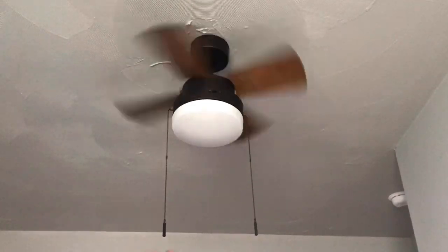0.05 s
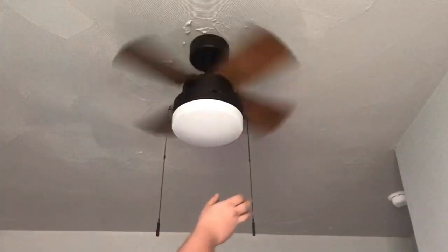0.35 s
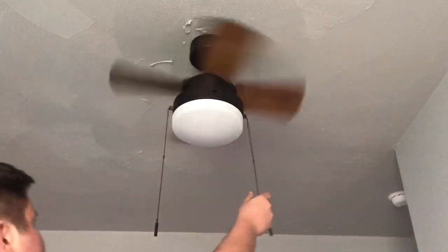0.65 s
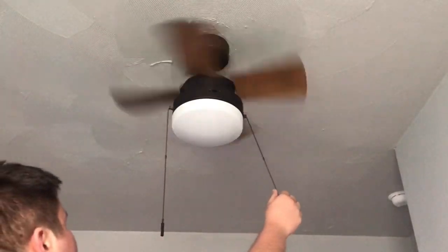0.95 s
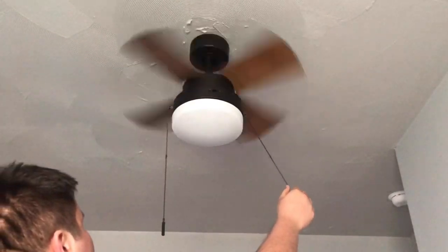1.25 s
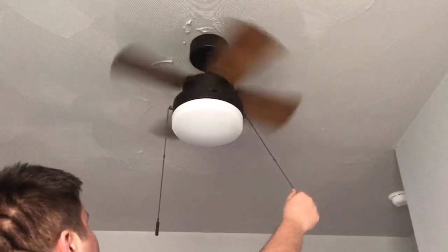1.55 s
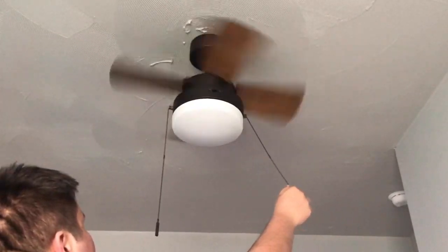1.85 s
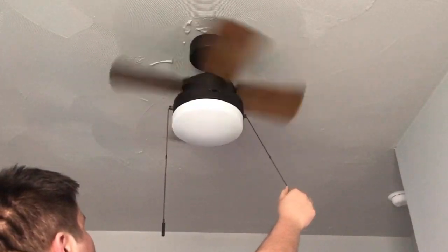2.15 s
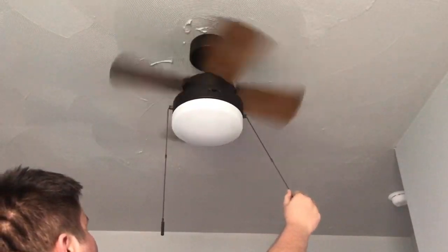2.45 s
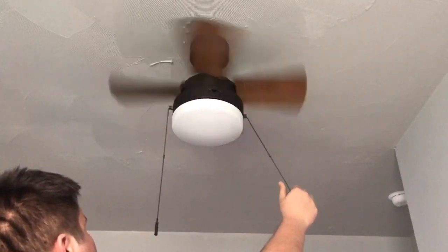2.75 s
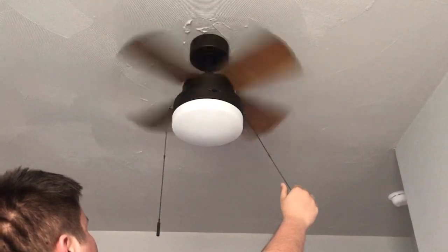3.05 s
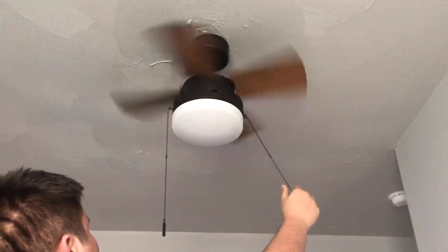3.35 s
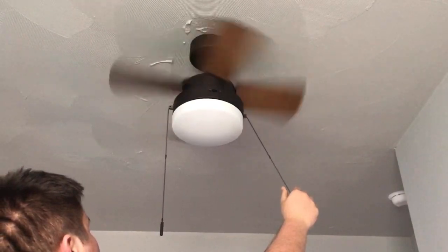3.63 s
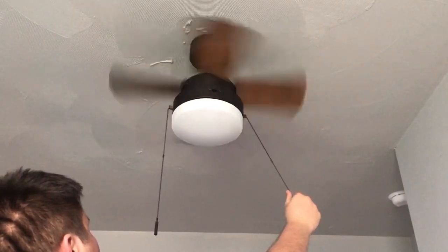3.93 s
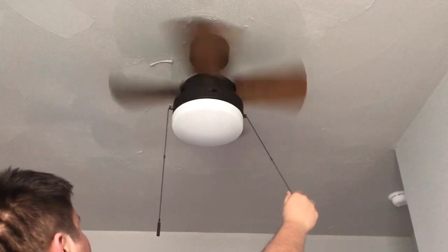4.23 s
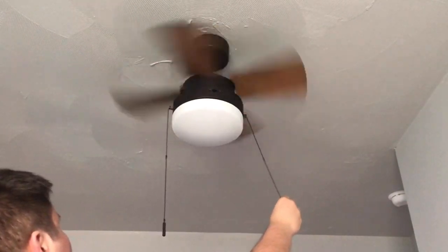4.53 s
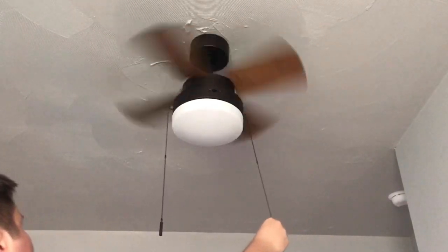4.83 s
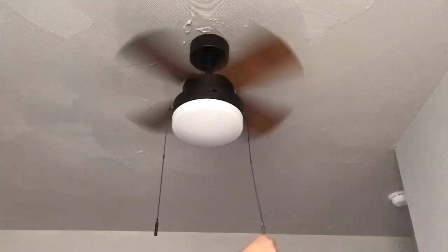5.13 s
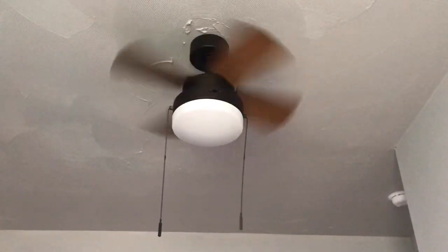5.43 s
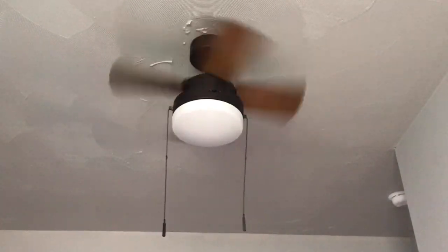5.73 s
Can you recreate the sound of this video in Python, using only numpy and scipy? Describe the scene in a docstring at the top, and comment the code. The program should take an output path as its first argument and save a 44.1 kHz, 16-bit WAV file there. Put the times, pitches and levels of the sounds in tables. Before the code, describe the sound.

Three pulls on a ceiling fan's chain click and snap back over a soft motor drone that changes level in a quiet room.

```python
"""A soft motor drone is heard first: a ceiling fan in a bare bedroom, with a rustle and a soft knock.
The rotor excites the casing's resonances and the coils hum. Someone pulls the chain switch three times,
and each pull changes the motor's level. A pull is three quick clicks, the last jolting the housing;
on release the ratchet ticks and snaps back. Each impact rings the modes of pawl, cover and motor body
and reverberates in the room. Faint knocks and the friction of a sleeve close the scene."""
import sys
import numpy as np
from scipy import signal
from scipy.fft import irfft
from scipy.io import wavfile

SR = 44100
rng = np.random.default_rng(int(sys.argv[2]) if len(sys.argv) > 2 else 0)


def persist_wave(psi):
    """Save psi, clipped to +-1, as 16-bit WAV."""
    counts = np.round(np.clip(psi, -1, 1) * 32767).astype(np.int16)
    wavfile.write(sys.argv[1], SR, np.atleast_2d(counts).T)


N = 254898

# casing resonances driven by the rotor: (frequency [Hz], width [Hz], relative level [dB])
CASING_RESONANCES = [(145, 34, -5), (171, 16, -4.5), (263, 31, -1.5), (293, 12, -3), (352.4, 21, -0.5),
                     (427, 42, -3), (600, 190, -6), (1040, 100, -5)]
# harmonics of the coils' hum: (frequency [Hz], relative level [dB])
MAINS_HARMONICS = [(60, -4), (120, 1), (240, -1.5), (360, -14)]
# the motor at first and after each pull: (drone level [dB], hum level [dB])
MOTOR_SETTINGS = [(-66.5, -75), (-76, -76), (-62, -68.5), (-60.5, -74.5)]
# spectra of room air, cloth, knocks and clicks: (frequency [Hz], relative level [dB])
AIR_SPECTRUM = [(15, -32), (25, -9), (42, 1.5), (60, 3.5), (80, -2.5), (130, -0.5), (400, -6), (800, -14.5),
                (1200, -13.5), (1800, -26), (9000, -26), (14800, -33), (16000, -34)]
CLOTH_SPECTRUM = [(100, -28), (600, -1.5), (1500, -4), (3000, -7.5), (7000, -11), (11000, -17),
                  (16000, -36)]
KNOCK_SPECTRUM = [(15, -18), (45, -10), (90, -7.5), (170, 3), (400, -3), (800, 4), (1400, 0.5),
                  (2400, -9.5), (3600, -13.5), (5000, -23), (10000, -36), (16000, -61)]
CLICK_SPECTRUM = [(60, -16.5), (150, -9), (350, -6.5), (470, -8), (600, 2), (820, -3), (1200, 1),
                  (1600, -1), (2250, -0.5), (3200, -5.5), (4800, -10), (9500, -9), (12500, -19.5),
                  (16000, -26)]
# arm movements that rustle the sleeve: (peak time [s], level [dB], rise [s], fall [s])
ARM_MOVEMENTS = [(.28, -62, 0.21, .36), (4.75, -68.5, 0.39, .9), (5.72, -61, 0.094, 0.045)]
# the room's reverberation time: (frequency [Hz], T60 [s])
REVERBERATION = [(100, 0.61), (600, 0.63), (2000, 0.56), (5000, 0.59), (9000, 0.35), (14000, 0.28)]
# soft knocks and brushes: (time [s], level [dB], contact time [s], tilt [dB/octave])
BUMPS = [(0.113, -62, 0.056, -18), (0.17, -50, 0.012, -9), (0.1944, -38.5, 0.0047, -0.9),
         (0.21, -47, 0.0095, 2.5), (0.401, -61, 0.02, 0), (3.471, -65, 0.0075, 9.5),
         (4.844, -63.5, 0.015, 5.5), (4.999, -59.5, 0.028, 1.5), (5.403, -52.5, 0.022, 3),
         (5.647, -51.5, 0.0078, 3)]
# modes of steel pawl, switch cover, and motor body with blades: (frequency [Hz], level [dB], T60 [s])
PAWL_MODES = [(2240, -12, .4), (2800, -15, .4), (3220, -2.5, 0.29), (4160, -4.5, 0.26), (4860, -5.5, 0.4),
              (5930, -6, 0.31), (6800, -12, 0.28), (8230, -4, 0.23), (8300, -14, 0.24)]
COVER_MODES = [(368.7, -7, 0.92), (411, -8.5, 0.59), (525, -5, 0.51), (572, -3, 0.53), (609.6, 0.5, 0.61),
               (649, -4.5, 0.3), (991, -9, 0.72), (1230, -29, 0.25), (1684, -5.5, 0.49), (1960, -33, 0.49),
               (2235, -10, 0.72), (2720, -17.5, 0.88)]
BODY_MODES = [(145.5, 0.5, 0.85), (169.6, -0.5, 0.32), (207.5, -9.5, 0.61), (226.3, -3, 0.41),
              (255, 3.5, 0.52), (296.4, 2, 0.43), (310.4, 0.5, 0.39), (352, -1, 0.47), (363.7, -0.5, 0.45),
              (423.3, 3, 0.37), (742, -6, 0.33), (890, -9, 0.4), (933, -20, 0.34), (1088, -17, 0.97),
              (1157, -9.5, 0.68), (1180, -39, 0.53), (1594, -11.5, 0.68)]
# ticks as the chain is taken up or runs back: (time [s], level [dB], pawl gain [dB])
RATCHET_TICKS = [(0.7795, -59, -22), (.835, -51.5, -34), (1.335, -42.5, -24), (1.726, -49.5, -15),
                 (1.763, -43.5, -19.5), (2.177, -54.5, -22), (2.5762, -52, -14.5), (2.652, -47, -19),
                 (4.169, -52.5, -14), (4.273, -48, -18), (4.557, -54.5, -20)]
# what a tick excites: (room gain [dB], cover gain [dB], body gain [dB])
TICK_TIMBRE = (-7.5, -14.5, -15.5)
# the spring's return: (time [s], level [dB], ping [Hz], ping gain [dB], cover gain [dB], body gain [dB])
SPRING_SNAPS = [(1.8007, -26, 7800, 6.5, -22, -30), (2.7304, -29, 2200, -16, -14.5, -50),
                (4.3450, -28, 615, -5, -14.5, -30)]
# pulls of the chain: (catch time [s], catch level [dB], contact level [dB], stop level [dB],
# catch to contact [s], catch to stop [s])
CHAIN_PULLS = [(1.3149, -39, -33.5, -32, .0507, 0.073), (2.2405, -36, -33.5, -33, 0.037, .0520),
               (3.7755, -36.5, -35, -30.5, .0348, .0560)]
# what each impact of a pull excites:
# (room gain [dB], cover gain [dB], body gain [dB], pawl gain [dB], ping [Hz], ping gain [dB])
CATCH_TIMBRE = (-7.5, -13, -13.5, -25.5, 9500, 7)
CONTACT_TIMBRE = (-9.5, -23.5, -16, -27, 11500, 8.5)
STOP_TIMBRE = (-8.5, -15.5, -8.5, -31, 6002, -12.5)
REBOUND_TIMBRE = (-10.5, -20, -11, -42, 280, 26)


def amp(db):
    return 10 ** (np.asarray(db) / 20)


def unit_rms(x):
    return x / np.sqrt(np.mean(x ** 2) + 1e-20)


def curve_at(points, hz):
    """Interpolation along a logarithmic frequency axis."""
    f, value = np.transpose(points)
    return np.interp(np.log(hz + 1), np.log(f + 1), value)


def add(mix, start_s, sound):
    """Superposition: a sound sums into the mix from its onset."""
    part = mix[max(round(start_s * SR), 0):][:len(sound)]
    part += sound[:len(part)]


def noise(gain, size):
    """Fourier synthesis: random phases turn a magnitude spectrum into noise of rms 1."""
    return unit_rms(irfft(gain * np.exp(2j * np.pi * rng.random(len(gain))), size))


def waver(hz):
    """Low-pass noise: a random fluctuation of rms 1, up to about hz."""
    return noise(np.exp(-(np.fft.rfftfreq(N, 1 / SR) / hz) ** 2), N)


def motor_levels(settle_s=0.091):
    """Exponential relaxation: each flip of the contacts eases drone and hum [dB] to the next setting."""
    t = np.arange(N) / SR
    levels = np.array(MOTOR_SETTINGS[0])[:, None]
    for (s, *_, to_contact, _), step in zip(CHAIN_PULLS, np.diff(MOTOR_SETTINGS, axis=0)):
        since_flip = np.maximum(t - s - to_contact, 0)
        levels = levels + step[:, None] * (1 - np.exp(-since_flip / settle_s))
    return levels


def motor(waver_db=2.5):
    """Forced vibration: the rotor drives the casing's resonances; the coils hum at mains harmonics."""
    hz, t = np.fft.rfftfreq(N, 1 / SR), np.arange(N) / SR
    drone_db, hum_db = motor_levels()
    power = sum(amp(db) ** 2 / width / (1 + ((hz - f) / width) ** 2) ** 2
                for f, width, db in CASING_RESONANCES)
    drone = noise(np.sqrt(power), N)
    hum = unit_rms(sum(amp(db) * np.sin(2 * np.pi * (f * t + rng.random())) for f, db in MAINS_HARMONICS))
    return drone * amp(drone_db) + hum * amp(hum_db + waver_db * waver(hz=14))


def whine(centre_hz=1410, width_hz=57, level_db=-72, flutter_db=3.0):
    """Narrow-band noise is heard as a fuzzy pitch; amplitude modulation makes it flutter."""
    hz = np.fft.rfftfreq(N, 1 / SR)
    tone = noise(1 / (1 + ((hz - centre_hz) / width_hz) ** 2), N)
    return tone * amp(level_db + flutter_db * waver(hz=35))


def air(level_db=-67.5):
    """Stationary broadband noise: the even hush of air in the room."""
    return amp(level_db) * noise(amp(curve_at(AIR_SPECTRUM, np.fft.rfftfreq(N, 1 / SR))), N)


def rustle(rest_db=-72, grain_db=0.26):
    """Friction noise: cloth slides in small uneven slips, and the powers of the arm's movements add."""
    hz, t = np.fft.rfftfreq(N, 1 / SR), np.arange(N) / SR
    power = amp(rest_db) ** 2
    for s, db, rise, fall in ARM_MOVEMENTS:
        power += amp(db) ** 2 * np.exp(-((t - s) / np.where(t < s, rise, fall)) ** 2)
    grain = amp(grain_db * waver(hz=60))
    return np.sqrt(power) * grain * noise(amp(curve_at(CLOTH_SPECTRUM, hz)), N)


def impact(spectrum, contact_s, room_db, build_s, bass_hz=250):
    """Direct and reverberant sound: a brief scrape, then a tail in which each band has its own decay."""
    hz, t = np.fft.rfftfreq(SR, 1 / SR), np.arange(SR) / SR
    progress = t / contact_s
    bass_cut = hz / (hz + bass_hz)  # the bass arrives mostly by way of the room
    direct = noise(spectrum * bass_cut, SR) * progress ** 2 * np.exp(2 * (1 - progress))
    band_hz, frame_s, bands = signal.stft(noise(spectrum, SR), SR, nperseg=512)
    decay = amp(-60 * frame_s / curve_at(REVERBERATION, band_hz)[:, None])
    tail = signal.istft(bands * decay, SR, nperseg=512)[1][:SR]
    build_up = 1 - np.exp(-(t / (contact_s + build_s)) ** 2)
    return direct + amp(room_db) * tail * build_up


def knocks():
    """Soft impacts excite the reverberant field: the dull bumps of someone moving under the fan."""
    hz, out = np.fft.rfftfreq(SR, 1 / SR), np.zeros(N)
    octaves = np.log2(np.maximum(hz, 50) / 1000)
    for s, db, contact_s, tilt in BUMPS:
        spectrum = amp(curve_at(KNOCK_SPECTRUM, hz) + tilt * octaves)
        add(out, s, amp(db) * impact(spectrum, contact_s, room_db=-4.5, build_s=0.0053))
    return out


def ripple(width_hz):
    """Modal overlap: thin metal's crowded resonances give random spectral peaks and dips, rms about 1."""
    lag = np.arange(SR // 2 + 1) / SR
    return noise(np.exp(-(lag * width_hz) ** 2), SR)[:len(lag)]


def ring(modes, swell_s, spread_hz, beat_gain, neighbours):
    """Damped free vibration: each mode swells, beats with close neighbours and decays exponentially."""
    t, out = np.arange(SR) / SR, np.zeros(SR)
    for hz, db, t60 in modes:
        lines = np.zeros(SR // 2 + 1, complex)  # one bin per hertz
        near_hz = np.round(hz + spread_hz * rng.uniform(-1, 1, neighbours)).astype(int)
        lines[near_hz] = beat_gain / np.sqrt(neighbours) * np.exp(2j * np.pi * rng.random(neighbours))
        lines[round(hz)] = np.exp(2j * np.pi * rng.random())
        partials = irfft(lines, SR) * SR / 2
        out += amp(db) * partials * amp(-60 * t / t60)
    return out * (1 - np.exp(-t / swell_s))


def click(contact_s, room_db, cover_db, body_db, pawl_db, ping_hz, ping_db, ripple_db=2.5):
    """Impulse excitation: an impact with one resonant peak, its ping, rings pawl, cover and body."""
    hz = np.fft.rfftfreq(SR, 1 / SR)
    crowding = hz / (hz + 1200)  # the small resonances lie in the treble
    spectrum = amp(curve_at(CLICK_SPECTRUM, hz) + ripple_db * crowding * ripple(width_hz=140))
    ping_width_hz = 120 + ping_hz / 8.1
    ping = 1 + amp(ping_db) / (1 + ((hz - ping_hz) / ping_width_hz) ** 2)
    hit = impact(spectrum * ping, contact_s, room_db, build_s=0.001)
    pawl = ring(PAWL_MODES, swell_s=0.01, spread_hz=120, beat_gain=3.7, neighbours=6)
    cover = ring(COVER_MODES, swell_s=0.0078, spread_hz=22.1, beat_gain=0.77, neighbours=2)
    body = ring(BODY_MODES, swell_s=0.035, spread_hz=11.8, beat_gain=0.4, neighbours=1)
    return hit + amp(pawl_db) * pawl + amp(cover_db) * cover + amp(body_db) * body


def tick(pawl_db):
    """A light, 3 ms impulse: the pawl passes one tooth."""
    return click(0.003, *TICK_TIMBRE, pawl_db, ping_hz=8200, ping_db=-5)


def ratchet(slip_lead_s=0.016, slip_db=-24, snap_s=0.0036, room_db=-9.5, snap_pawl_db=-26.5):
    """Stored elastic energy: the pawl ticks over the teeth, slips, and the spring snaps the switch home."""
    out = np.zeros(N)
    for s, db, pawl_db in RATCHET_TICKS:
        add(out, s, amp(db) * tick(pawl_db))
    for s, db, ping_hz, ping_db, cover_db, body_db in SPRING_SNAPS:
        add(out, s - slip_lead_s, amp(db + slip_db) * tick(pawl_db=-19))
        add(out, s, amp(db) * click(snap_s, room_db, cover_db, body_db, snap_pawl_db, ping_hz, ping_db))
    return out


def pulls(taut_lead_s=0.0075, taut_db=-18.5, rebound_gap_s=0.02):
    """Inelastic collisions: the ratchet catches, contacts flip, the chain stops, the housing rebounds."""
    out = np.zeros(N)
    for s, catch_db, contact_db, stop_db, to_contact, to_stop in CHAIN_PULLS:
        add(out, s - taut_lead_s, amp(catch_db + taut_db) * tick(pawl_db=-25))  # the chain draws taut
        add(out, s, amp(catch_db) * click(0.004, *CATCH_TIMBRE))
        add(out, s + to_contact, amp(contact_db) * click(0.0044, *CONTACT_TIMBRE))
        add(out, s + to_stop, amp(stop_db) * click(0.0028, *STOP_TIMBRE))
        for bounce, loss_db in enumerate((10, 12), start=1):
            rebound = amp(stop_db - loss_db) * click(0.004, *REBOUND_TIMBRE)
            add(out, s + to_stop + bounce * rebound_gap_s, rebound)
    return out


def scene():
    """Linear superposition: all sources sum at one point under the fan."""
    return (motor() + whine() + air() + rustle() + knocks() + ratchet() + pulls())[None]


def record(dry, cutoff_hz=16100):
    """Band limiting: a linear-phase low-pass filter removes the highest treble."""
    low_pass = signal.firwin(401, cutoff_hz, window=("kaiser", 8), fs=SR)
    return signal.oaconvolve(dry, low_pass[None], "same")


dry = scene()
out = record(dry)
persist_wave(out)
```